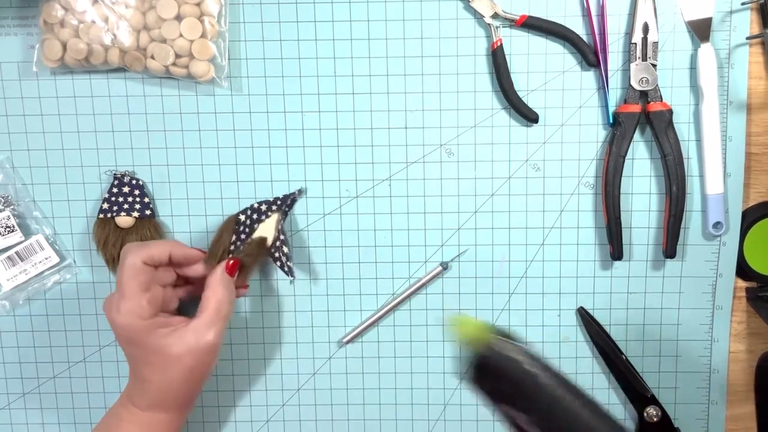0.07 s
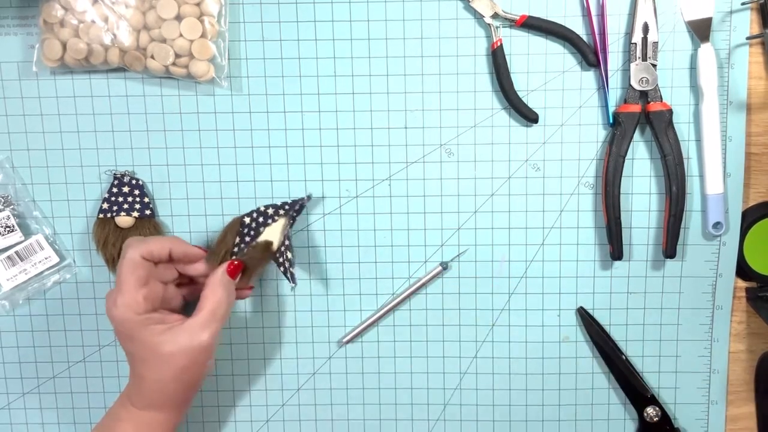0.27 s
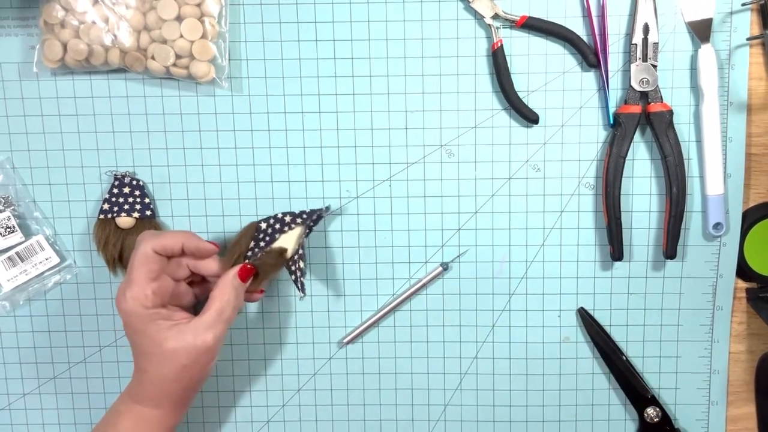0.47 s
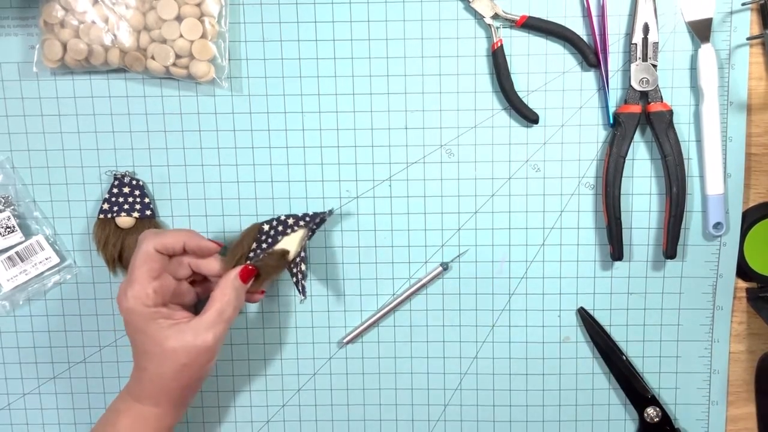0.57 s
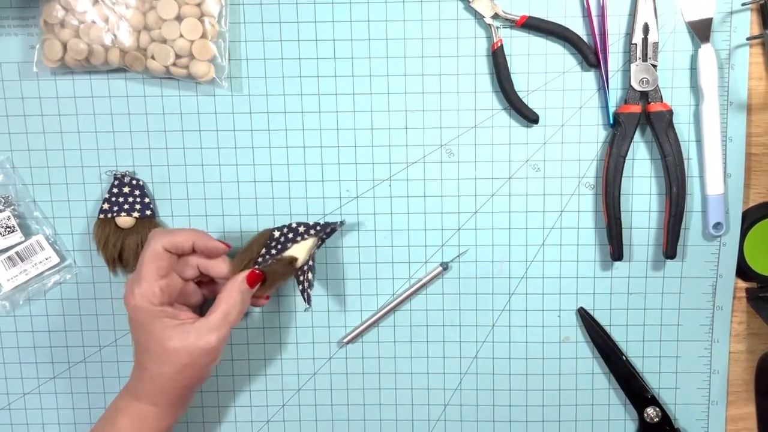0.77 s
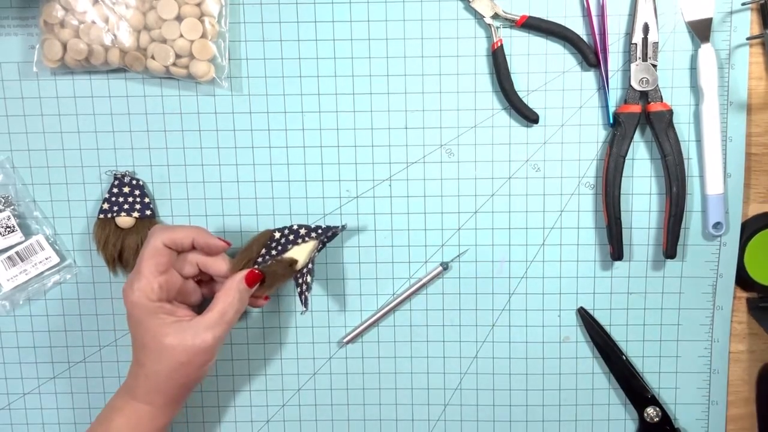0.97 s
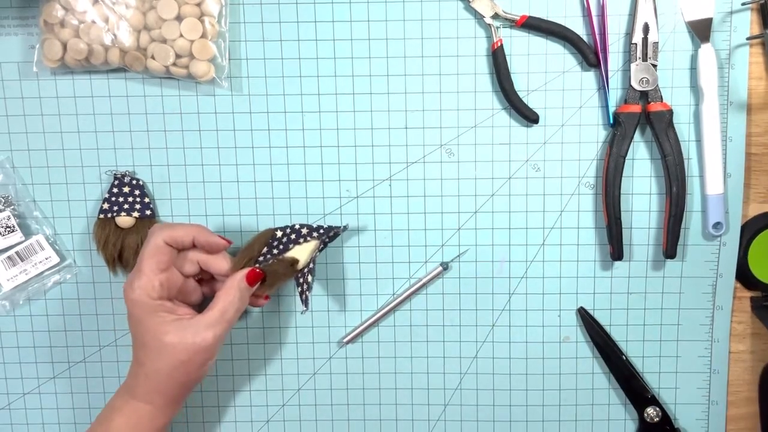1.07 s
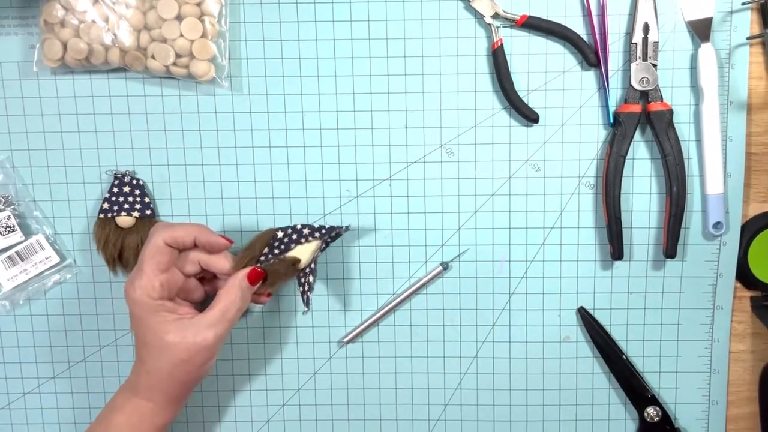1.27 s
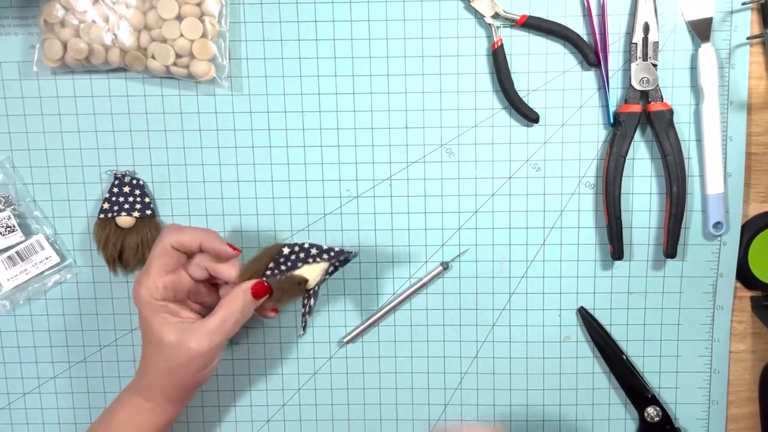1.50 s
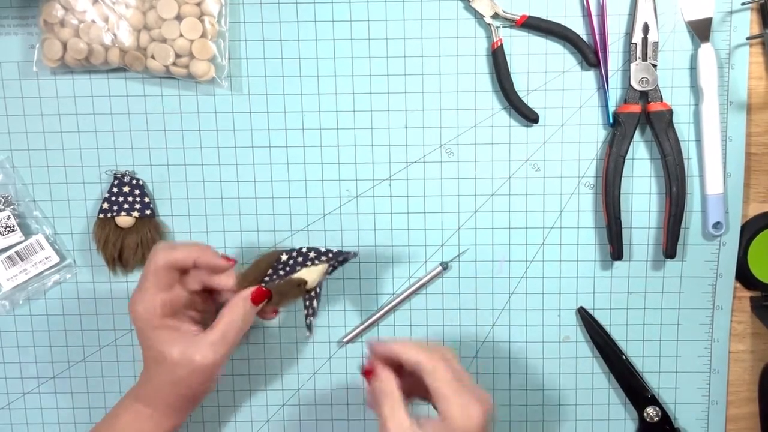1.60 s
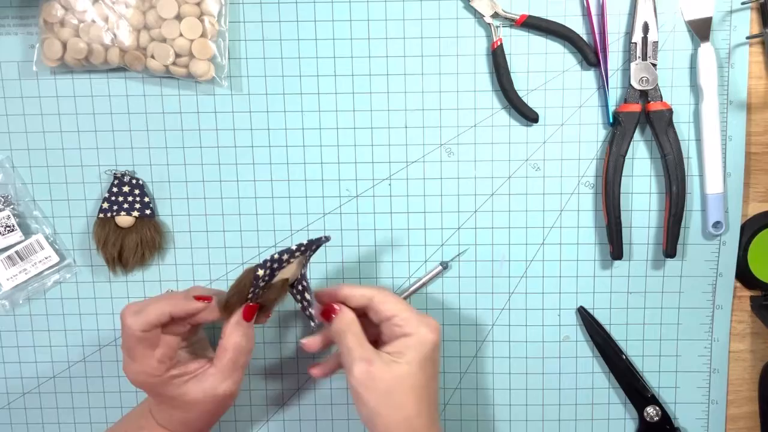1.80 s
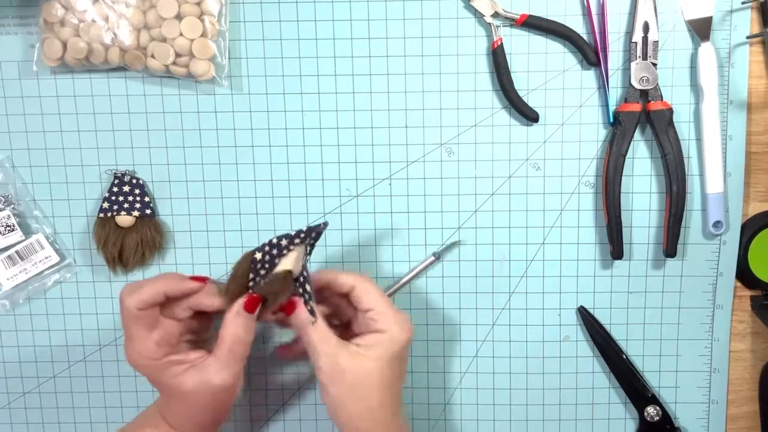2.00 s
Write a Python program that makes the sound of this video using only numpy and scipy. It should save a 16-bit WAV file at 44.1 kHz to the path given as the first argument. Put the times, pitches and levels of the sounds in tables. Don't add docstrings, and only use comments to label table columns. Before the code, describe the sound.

Hard plastic clatters briefly onto a matted desk in a quiet room with faint fan hum.

```python
import sys
import numpy as np
from scipy import signal
from scipy.fft import rfft, irfft
from scipy.io import wavfile

SR = 44100
rng = np.random.default_rng(int(sys.argv[2]) if len(sys.argv) > 2 else 0)


def attenuation_scalar(level_db):
    decades = np.asarray(level_db, float) / 20
    return 10 ** decades


def transcribe(u):
    v = np.clip(np.atleast_2d(u).T, -1, 1)
    q = np.round(v * 32767).astype(np.int16)
    wavfile.write(sys.argv[1], SR, q)


N = 90404
HZ = np.fft.rfftfreq(N, 1 / SR) + 1e-3

# t/s, tick level/dB, stand level/dB, shell level/dB, desk level/dB
CONTACTS = [(0.793, -31.5, -27.5, -34, -29.5), (0.796, -49, -44, -29, -58), (0.8051, -45, -50, -44, -27),
            (0.8127, -42, -31, -33, -25.5), (0.816, -32.5, -43, -54, -37), (.823, -34, -49, -29.5, -24.5),
            (0.827, -56, -28.5, -34, -58), (0.841, -27.5, -34, -44, -56), (0.8442, -26.5, -26, -54, -61),
            (0.8488, -39, -29.5, -22.5, -32), (0.852, -27, -19, -47, -24.5), (0.854, -36, -46, -46, -22.5),
            (0.863, -45, -20.5, -34, -34), (0.871, -52, -56, -34, -29), (0.882, -41, -34.5, -54, -52),
            (.903, -51, -54, -52, -32), (0.917, -40, -53, -45, -52), (.931, -40, -37, -37, -50),
            (0.9399, -13, -42, -42, -48), (.941, -22, -27, -8.5, -36), (.9436, -56, -21, -26, -32),
            (0.9454, -62, -44, -42, -28), (0.9558, -37, -20.5, -20.5, -57),
            (0.9569, -25.5, -21.5, -23.5, -50), (.967, -33, -42, -39, -31.5), (0.976, -32, -35, -58, -24),
            (1.053, -56, -56, -47, -45)]
# f/Hz, centre level/dB, side level/dB, T60/s
STAND_MODES = [(1823, -6, -4, 0.02), (2310, -8, 2, 0.036), (2588, -16.5, -12, 0.041),
               (3110, -11, -3, 0.016), (5930, -14, -15, 0.0088)]
SHELL_MODES = [(610, -12, -19, .02), (700, -6, -14, .03), (805, -5, -17, .03), (995, 0, -10, .022),
               (1120, 5, -14, .008), (1245, -2, -7, .024), (1345, -3, -7, .018), (1700, -9, -7, .025),
               (1900, -7, -4, .018), (3680, -3, -19, .013), (3870, -2, -24, .014), (4330, -9, -20, .02)]
DESK_MODES = [(74, -17, -24, 0.087), (98.4, -6, -30, 0.043), (115, -13, -23, 0.067),
              (165.3, -2.5, -25, 0.06), (265, 1, -14, 0.037), (383, -5.5, -18, 0.094),
              (476, -7.5, -18, 0.052)]
# f/Hz, level/dB
TICK_MID = [(300, -10), (850, 3), (3200, -9), (4000, -1), (5200, -6), (6800, -0.5), (8200, -14),
            (9600, -29.5)]
TICK_SIDE = [(300, -23), (1500, 5), (2500, 7), (4000, -8.5), (7000, -1.5), (10000, -8), (12500, -13),
             (14500, -26)]
TICK_TOP = [(9000, -42), (10500, -16.5), (12300, -3), (15500, -9.5), (16500, -17)]
# t/s, peak level/dB, strongest f/Hz, dispersion/cycles
THUMPS = [
    (.795, -20, 90, 1.25),
    (.8505, -25, 75, 1.7),
    (.9412, -23, 148, 1.6),
    (.966, -30, 100, 1.),
]
# f/Hz, level/dB
CLOTH_BANDS = [(3950, 0), (3350, -8), (2550, -4)]
# f/Hz, level/dB per Hz
AIR_CENTRE = [(20, -23), (45, -8), (70, -8), (120, -3.5), (300, -15), (1100, -22), (1700, -20.5),
              (2800, -33.5),
              (7000, -41), (8300, -59.5), (10600, -59.5), (11600, -50), (14000, -48.5), (16000, -41)]
# f/Hz, level/dB per Hz
AIR_SIDE = [(24, -74), (40, -33), (124, -1.5), (222, 4.5), (264, 7.5), (1620, 9), (8580, -15.5),
            (11800, -20), (14000, -33)]
# f/Hz, share
AIR_LEAN = [(200, -0.24), (400, -0.73), (700, 0.41), (1300, 0.68), (2400, 0.39), (4400, 0.026)]
# f/Hz, bandwidth/Hz, level/dB rms
WHINES = [(399, 42, -64), (774, 56, -66.5), (1443, 2.5, -68), (1618, 8.6, -66.5), (1734, 95, -60.5),
          (2490, 210, -76.5)]
# f/Hz, level/dB rms
HUM_LINES = [(58.2, -40), (119, -51.5), (198.5, -59.5)]


def rms_one(x):
    return x / np.sqrt(np.mean(x ** 2) + 1e-20)


def at_hz(points):
    hz, value = np.array(points).T
    return np.interp(np.log(HZ), np.log(hz), value)


def drift(rate):
    steps = int(N / SR * rate) + 2
    return np.interp(np.arange(N) / SR * rate, np.arange(steps), rng.standard_normal(steps))


def ring(x, hz, t60):
    radius, angle = attenuation_scalar(-60 / (t60 * SR)), 2 * np.pi * hz / SR
    poles = [1, -2 * radius * np.cos(angle), radius * radius]
    return signal.lfilter([0, np.sin(angle)], poles, x + 1e-18)


def minimum_phase(db):
    cepstrum = irfft(db * np.log(10) / 20, N)
    cepstrum[1:N // 2] *= 2
    cepstrum[N // 2 + 1:] = 0
    return np.exp(rfft(cepstrum))


def impacts(db):
    out = np.zeros(N)
    out[(np.array(CONTACTS)[:, 0] * SR).astype(int)] = attenuation_scalar(db)
    return out


def ticks():
    db, age = np.array(CONTACTS)[:, 1], np.arange(2000) / SR
    hard = impacts(db + 0.42 * (db + 20))
    hard[int(0.0895 * SR)] = attenuation_scalar(-42)
    low = np.convolve(impacts(db), attenuation_scalar(-60 * age / 0.019))[:N]
    top = np.convolve(hard, attenuation_scalar(-60 * age / 0.013))[:N]
    grit = attenuation_scalar(1.5 * drift(1500.0))
    burst = np.array([low, low, top]) * grit * rng.standard_normal((3, N))
    filters = [minimum_phase(at_hz(curve)) for curve in (TICK_MID, TICK_SIDE, TICK_TOP)]
    mid, side, high = irfft(rfft(burst) * filters, N)
    return np.array([mid + high, side])


def body(modes, column, lag_cycles, lean):
    spread_db, side_lag_s = 1.5, 0.00005
    out, db = np.zeros((2, N)), np.array(CONTACTS)[:, column]
    for hz, mid_db, side_db, t60 in modes:
        push = np.hanning(int(2 * lag_cycles * SR / hz) + 3)[1:-1]
        push = push * np.cos(2 * np.pi * hz / SR * np.arange(len(push))) * 2 / push.sum()
        strength_db = db + spread_db * rng.standard_normal(len(db))
        hit = signal.fftconvolve(impacts(strength_db), push)[:N]
        tone = ring(hit, hz, t60)
        out[0] += attenuation_scalar(mid_db - 3) * tone
        out[1] += lean * attenuation_scalar(side_db - 4) * np.roll(tone, int(side_lag_s * SR))
    return out


def stand():
    return body(STAND_MODES, column=2, lag_cycles=2.5, lean=0.61)


def shell():
    return body(SHELL_MODES, column=3, lag_cycles=0.96, lean=1)


def desk():
    return body(DESK_MODES, column=4, lag_cycles=0.78, lean=-1.35)


def thumps():
    rise_db, fall_db = 14, 4.5
    top_hz, side_db = 467, -27
    out = 0
    for s, db, hz, cycles in THUMPS:
        octaves = np.log2(HZ / hz)
        gain = attenuation_scalar(np.minimum(rise_db * octaves, -fall_db * octaves))
        gain = gain / (1 + (HZ / top_hz) ** 6.3)
        phase = 2 * np.pi * (HZ * s + cycles * np.log(HZ / top_hz))
        wave = irfft(gain * np.exp(-1j * phase), N)
        out = out - attenuation_scalar(db) * wave / np.abs(wave).max()
    return out * [[1], [-attenuation_scalar(side_db)]]


def room(x):
    t60_s, gap_s, level_db = 0.14, 0.0019, -12
    t = np.arange(SR // 2) / SR
    tail = rng.standard_normal((2, len(t))) * attenuation_scalar(-60 * t / t60_s) * (t > gap_s)
    band = signal.butter(1, [150, 2750], "band", fs=SR, output="sos")
    tail = signal.sosfilt(band, tail)
    tail /= np.sqrt(np.sum(tail ** 2, axis=1, keepdims=True))
    return attenuation_scalar(level_db) * signal.fftconvolve(x, tail, axes=1)[:, :N]


def rustle():
    centre_s, spread_s, level_db = 1.735, 0.15, -69
    swell = level_db - 4.3 * ((np.arange(N) / SR - centre_s) / spread_s) ** 2
    out = 0
    for hz, db in CLOTH_BANDS:
        scuff = rms_one(ring(rng.standard_normal(N), hz, 0.023))
        out = out + attenuation_scalar(swell + db + 4.3 * drift(45.0)) * scuff
    return out * [[1], [0.6]]


def air():
    mid_db, side_db, patchy_db = -45.5, -50.5, 0.83
    a, b = rfft(rng.standard_normal((2, N)) * attenuation_scalar(patchy_db * drift(11.9)))
    lean = np.clip(at_hz(AIR_LEAN), -0.95, 0.95)
    mid = irfft(a * attenuation_scalar(at_hz(AIR_CENTRE)), N)
    shared = lean * a + np.sqrt(1 - lean ** 2) * b
    side = irfft(shared * attenuation_scalar(at_hz(AIR_SIDE)), N)
    whine = 0
    for hz, width, db in WHINES:
        line = irfft(a / (1 + ((HZ - hz) / width * 2) ** 2), N)
        whine = whine + attenuation_scalar(db + 1.15 * drift(9.28)) * rms_one(line)
    return np.array([attenuation_scalar(mid_db) * rms_one(mid) + whine, attenuation_scalar(side_db) * rms_one(side) + whine])


def hum():
    t = np.arange(N) / SR
    out = 0
    for hz, db in HUM_LINES:
        level = np.sqrt(2) * attenuation_scalar(db + 1.4 * drift(9.0))
        out = out + level * np.sin(2 * np.pi * (hz * t + rng.random()))
    return out


def scene():
    gun = ticks() + stand() + shell() + desk() + thumps()
    mid, side = gun + room(gun) + rustle() + air()
    mid = mid + hum()
    return np.array([mid + side, mid - side])


def low_pass(x):
    return signal.sosfilt(signal.butter(12, 16380, fs=SR, output="sos"), x)


def record(dry):
    top_cut = signal.cheby2(10, 60, 16500, fs=SR, output="sos")
    bass_cut = signal.butter(4, 44, "high", fs=SR, output="sos")
    mix = signal.sosfilt(bass_cut, signal.sosfilt(top_cut, dry))
    return low_pass(mix)


dry = scene()
out = record(dry)
transcribe(out)
```